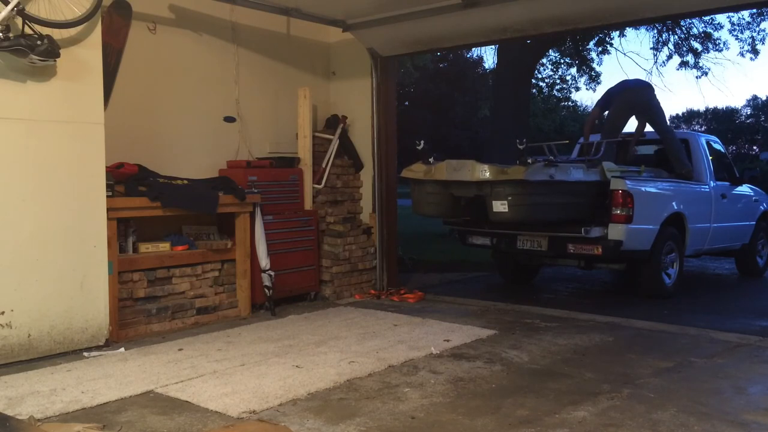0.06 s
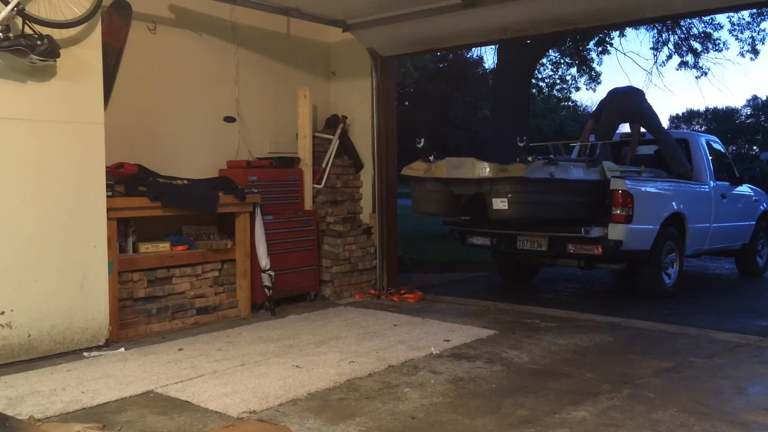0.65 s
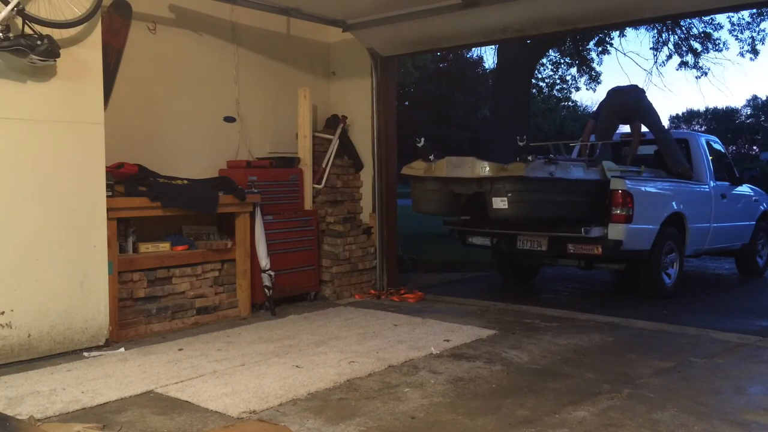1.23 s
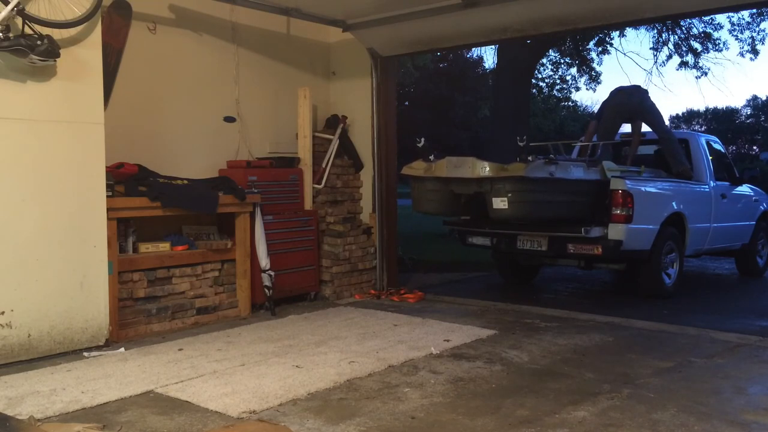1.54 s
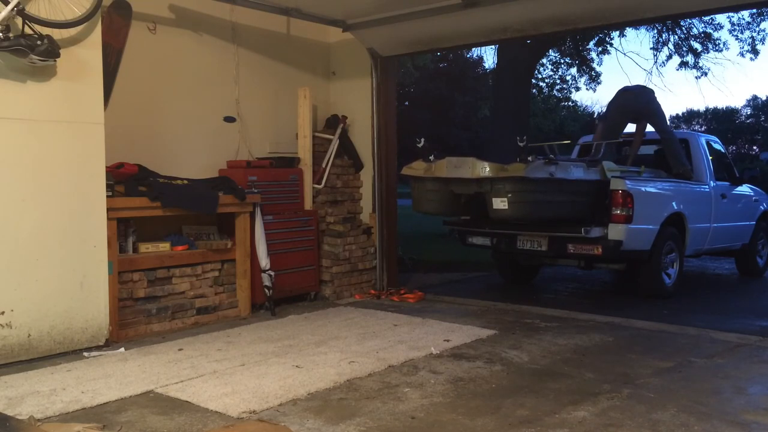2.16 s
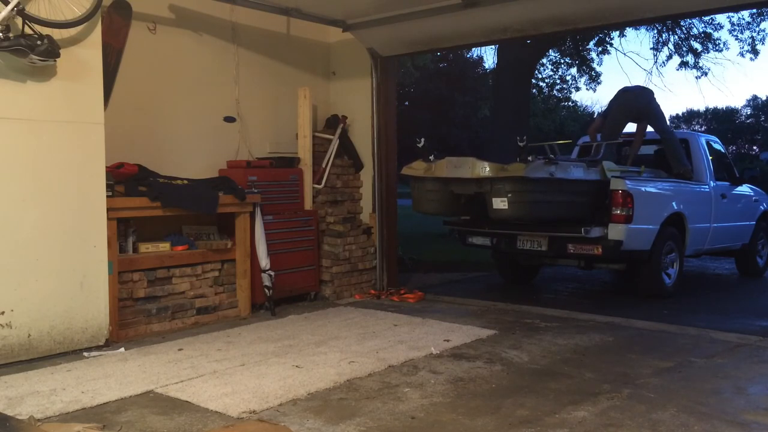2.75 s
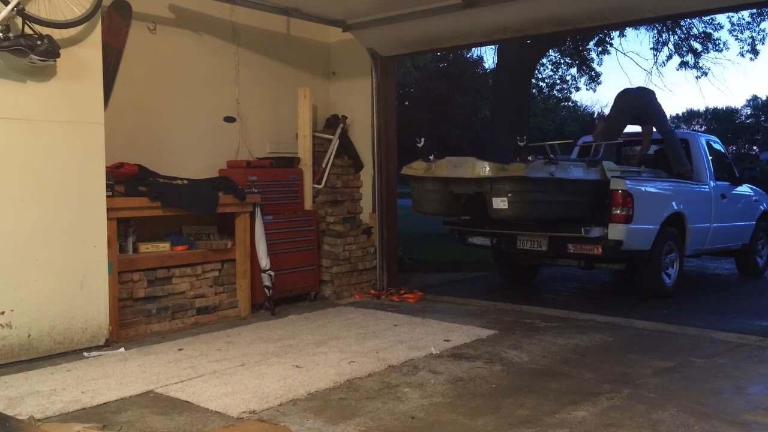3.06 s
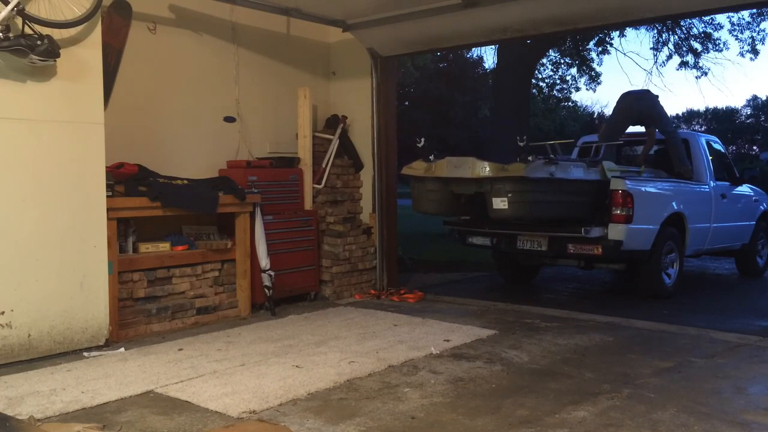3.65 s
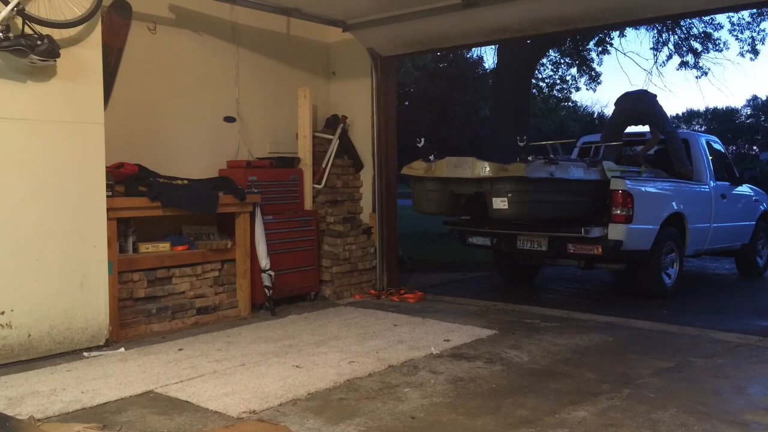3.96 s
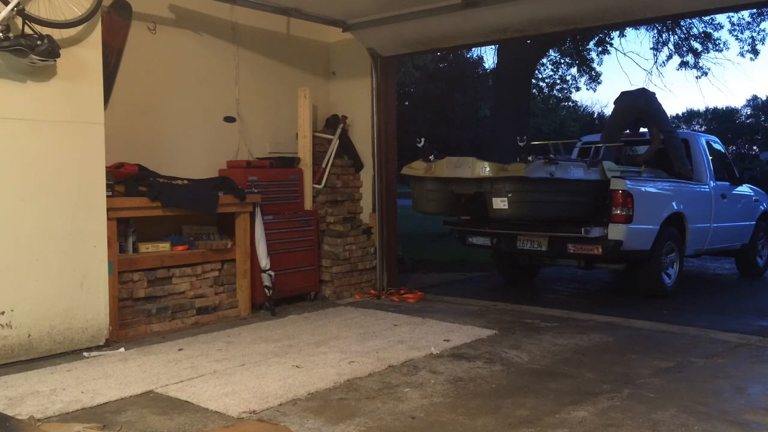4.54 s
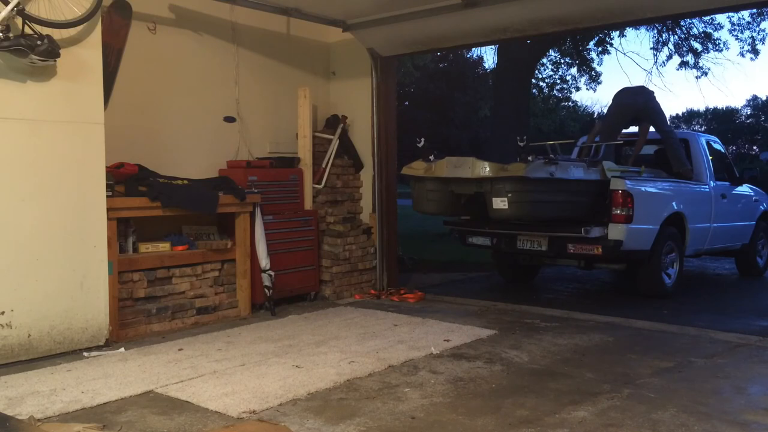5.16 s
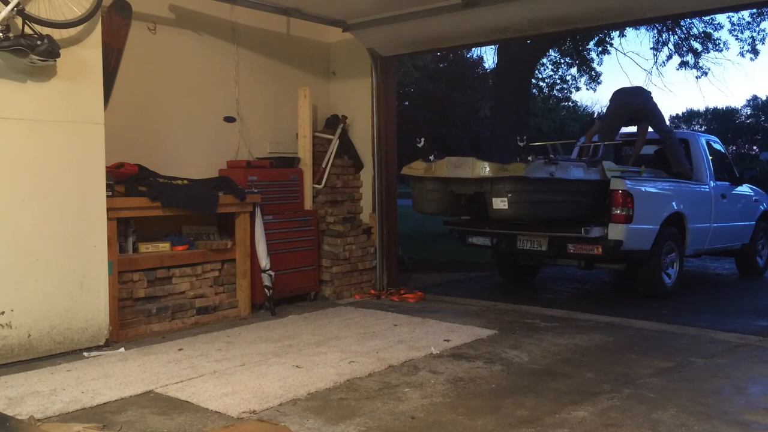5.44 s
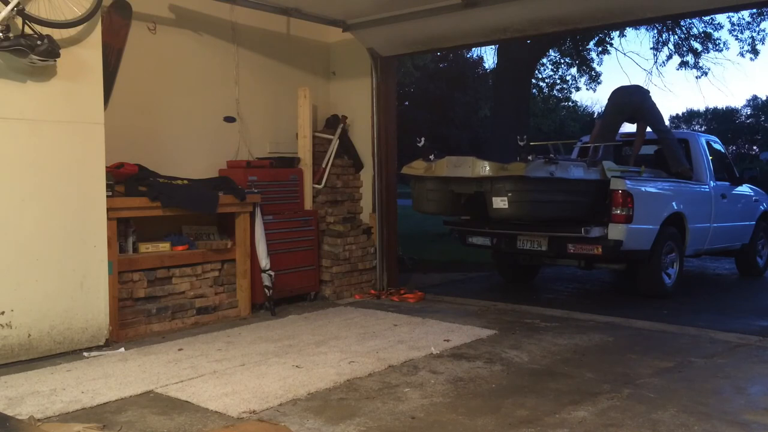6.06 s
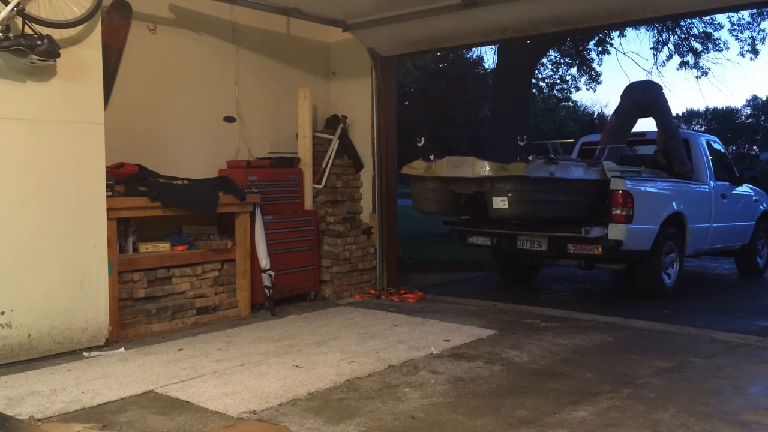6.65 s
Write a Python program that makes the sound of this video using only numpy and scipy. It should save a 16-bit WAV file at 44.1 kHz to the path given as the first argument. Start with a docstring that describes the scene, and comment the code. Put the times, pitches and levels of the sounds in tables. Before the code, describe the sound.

Scattered bumps, clicks and a few heavy hollow bangs as a boat is shifted on a truck, a small bird twittering outside.

```python
"""A plastic boat hull is shifted in a pickup bed, heard from inside an open garage.
Steps and bumps ring the bed panel, fittings snap, a hollow knock chatters. The hull scuffs in
stick-slip grains, drops hard and rocks to rest; blows ring its modes and the garage answers.
Outside, a small bird twitters in falling chips over a low, steady hum and a faint high one."""
import sys
import numpy as np
from scipy import signal
from scipy.fft import rfft, irfft, next_fast_len
from scipy.io import wavfile
from scipy.ndimage import map_coordinates

SR = 44100
rng = np.random.default_rng(int(sys.argv[2]) if len(sys.argv) > 2 else 0)


def pcm_store(signal):
    """Save signal as 16-bit PCM."""
    levels = np.round(np.clip(np.atleast_2d(signal), -1, 1) * 32767)
    wavfile.write(sys.argv[1], SR, levels.astype(np.int16).T)


N = 304290

# outdoor noise spectrum: f/Hz, density/dB
AIR_SPECTRUM = [(25, -23.5), (45, -8), (70, -2), (125, -9.5), (160, -8), (330, -14.5), (590, -22.5),
                (1050, -19.5), (1500, -28.5), (2200, -31), (3200, -35.5), (7000, -37.5), (15000, -46.5)]
# hums: f/Hz, level/dB, wander/Hz, wobble rate/(1/s), flutter/dB
HUMS = [(92.2, -55.5, 2.4, 16, 5), (2604, -79.5, 82, 600, 3)]
# low hum swell, halved for the high hum: t/s, gain/dB
HUM_SWELL = [(.4, -12), (1.05, -1), (6.9, -2)]
# clear bird chips: t/s, nominal f/Hz
CHIPS = [(0.127, 5950), (0.215, 5850), (0.823, 6860), (.887, 6430), (1.02, 6170), (1.137, 6820),
         (1.195, 6780), (1.254, 6780), (1.317, 6350), (1.349, 6080), (1.375, 6400), (1.443, 5880),
         (1.556, 5720), (1.761, 5860), (6.497, 6330), (6.569, 5600)]
# bouts of soft twitter: start/s, end/s
BOUTS = [(0, .38), (0.701, 1.92), (6.351, 6.85)]
# impact spectrum: f/Hz, density/dB
CONTACT_SPECTRUM = [(30, -26), (60, -10), (85, -16.5), (130, 1), (200, -1.5), (260, -3), (400, -2),
                    (900, -10.5), (1700, -14.5), (2200, -18.5), (2800, -23.5), (4500, -29), (7000, -34),
                    (10000, -43), (15000, -51.5)]
# boat and truck decay: f/Hz, t60/s
BODY_T60 = [(60, .45), (170, 0.6), (500, 0.46), (1500, 0.41), (4000, 0.39), (12000, 0.27)]
# garage decay: f/Hz, t60/s
GARAGE_T60 = [(60, 1.86), (200, 1.24), (700, 1.01), (2000, 0.78), (5000, 0.61), (12000, 0.37)]
# crossovers between thump, knock, clack, click: f/Hz
CROSSOVERS_HZ = [240, 700, 2500]
# steps and bumps on the bed: t/s, strength/dB, hardness/dB, panel ring/dB
BUMPS = [(.442, -46, -2, 3), (.52, -42, 0.5, -11), (.599, -49.5, 2.5, -3), (.763, -45.5, 1.5, -8.5),
         (1.052, -61, 12.5, -10), (1.106, -43.5, 3, 9.5), (1.16, -53, -1.5, 15), (1.345, -54, 4, -16),
         (1.404, -57.5, 13.5, -13), (1.726, -54, -6, -9), (2.225, -49.5, 0.5, -2.5), (2.40, -48, 7, 4),
         (2.635, -53.5, 9.5, -11), (2.667, -56, -7, -1.5), (3.02, -44.5, -1.5, -6.5),
         (3.5, -45.5, -3.5, -7), (4.395, -58, -12, -15), (5.485, -43, -3.5, -12), (5.599, -53.5, -7.5, -8),
         (5.759, -34, 2, 4.5), (5.907, -40, 2.5, -21), (6.067, -61, 9.5, -15), (6.230, -43, 2.5, -14.5),
         (6.259, -48, -7.5, -9), (6.578, -44.5, -5.5, -9.5), (6.876, -50.5, 0, -15)]
# bump thump, knock, clack, click: offset/dB, hardness slope/(dB/dB)
BUMP_BANDS = [(2.5, -0.8), (1.5, 0), (1.5, 1), (-23.5, 1.2)]
# bed panel modes, unloaded: f/Hz, level/dB, t60/s
PANEL_MODES = [(162, -14.5, 0.36), (183, -11, 0.31), (214, -6, 0.6), (270.4, -3.5, 0.47), (297.6, -3, 0.63),
               (333.3, -1, 0.6), (481, -11.5, 0.54)]
# hull slides: centre t/s, half length/s, level/dB
SCUFFS = [(0.502, 0.1, -62.5), (2.405, 0.052, -59), (4.132, 0.03, -40), (5.585, 0.038, -61.5),
          (5.687, 0.045, -64.5), (6.69, 0.081, -64)]
# scuff and snap spectrum: f/Hz, density/dB
RUB_SPECTRUM = [(150, -18.5), (400, 5.5), (1000, 5.5), (2500, -3), (6000, -4), (10000, -10.5),
                (15000, -20.5)]
# strap fitting snaps: t/s, relative level/dB
SNAPS = [(.756, -45.5), (0.9513, -50.5), (1.1081, -47), (1.1255, -48.5), (2.223, -55.5), (3.5752, -50.5),
         (4.0848, -41), (5.4525, -50), (5.986, -55.5)]
# small hollow shell modes: f/Hz, level/dB, t60/s
HOLLOW_MODES = [(400, -5, 0.23), (417, -0.5, 0.18), (461, -2.5, 0.21), (541, -1, 0.14), (599, 1, 0.18),
                (710, 3, 0.1), (827, -4, .1), (942, 11, 0.061), (1013, 2, 0.062), (1100, -0.5, 0.07),
                (1254, -2.5, 0.053)]
# heavy hull blows: t/s, strength/dB, hardness/dB, shell boom/dB, rise/s, pitch ratio
SLAMS = [(4.098, -37.5, -1.5, 13.5, 0.012, 0.86), (4.124, -33, -2.5, 2, 0.0076, 0.85),
         (4.204, -35.5, -5.5, -0.5, 0.0088, 0.81), (4.6654, -15, 5, 4.5, 0.0066, 1.007),
         (4.903, -19.5, 2.5, -1.5, 0.012, 1.004), (4.959, -23.5, -3, -8, 0.0078, 0.95),
         (5.031, -24, -1, -2, 0.0073, 1.036)]
# slam thump, knock, clack, click: offset/dB, hardness slope/(dB/dB), boom slope/(dB/dB)
SLAM_BANDS = [(-4, 0, 1.15), (-0.5, 0, 0), (6, 1, 0), (-15.5, 1.26, 0.5)]
# hull modes, free: f/Hz, level/dB, t60/s
HULL_MODES = [(94.5, -11, .35), (109.5, -6, .4), (132, -3, .28), (149, 3, .34), (161, -6, .35),
              (185.5, -3, .36), (197.4, 2, .6), (232.5, -12, .5), (356.5, -8, .46), (375.9, -6, .6),
              (398.5, -8, .4), (444.3, -8, .56), (473.6, -11, .6), (537.4, -7, .55), (618.8, -6, .52),
              (660.2, -10, .56), (710.6, -12, .56), (772, -9, .4), (887.7, -11, .5), (959.2, -11, .52),
              (1080.8, -13, .5), (1192.6, -14, .46), (1332, -16, .36), (1488.2, -14, .5),
              (1641.6, -13, .43), (1848, -19, .4), (2510, -20, .4)]
# thin rings after the hardest blows: t/s, level/dB
ZINGS = [(4.675, -48), (4.915, -63)]
# their close, beating modes: f/Hz, level/dB, t60/s
ZING_MODES = [(13043, -1, 0.34), (13088, 0.5, 0.41), (13700, -6, .45), (13770, -1, .45),
              (13720, -8.5, 0.35), (14230, -0.5, 0.43), (14460, -2.5, .45)]

TOP_HZ = 15300


def amp(db):
    """dB to gain."""
    return 10 ** (np.asarray(db) / 20)


def rms(x):
    """Root mean square."""
    return np.sqrt(np.mean(x ** 2) + 1e-20)


def along(points, hz):
    """Interpolate (f/Hz, value) points on a log axis."""
    f, v = np.transpose(points)
    return np.interp(np.log(hz + 1), np.log(f + 1), v)


def filtered(x, response):
    """Apply a frequency response."""
    size = next_fast_len(len(x) + 8192)
    return irfft(rfft(x, size) * response(np.fft.rfftfreq(size, 1 / SR)), size)[:len(x)]


def noise(spectrum, size):
    """Coloured noise, rms 1."""
    x = filtered(rng.standard_normal(size), lambda hz: amp(along(spectrum, hz)))
    return x / rms(x)


def impulses(per_s):
    """Sparse random impulses."""
    return rng.standard_normal(N) * (rng.random(N) < per_s / SR)


def wobble(per_s, size=N):
    """Smooth random curve, per_s knots a second."""
    knots = rng.standard_normal(int(size * per_s / SR) + 4)
    return map_coordinates(knots, [np.arange(size) * per_s / SR])


def damped(x, t60_curve):
    """Decay each frequency at its own t60."""
    hz, t, bins = signal.stft(x, SR, nperseg=512)
    return signal.istft(bins * amp(-60 * t / along(t60_curve, hz)[:, None]), SR)[1][:len(x)]


def ringing(modes, t, scatter_db):
    """Damped modes, random in level and phase per strike."""
    return sum(amp(db + rng.normal(0, scatter_db) - 60 * t / t60_s)
               * np.sin(2 * np.pi * (hz * t + rng.random())) for hz, db, t60_s in modes)


def add(track, at_s, x):
    """Mix x into track."""
    start = max(round(at_s * SR), 0)
    part = track[start:start + len(x)]
    part += x[:len(part)]


def garage(x, wet_db):
    """Direct sound plus diffuse tail."""
    t = np.arange(SR) / SR
    tail = damped(rng.standard_normal(SR), GARAGE_T60) * (1 - np.exp(-t / 0.0031))
    return x + amp(wet_db) * signal.fftconvolve(x, tail / np.linalg.norm(tail))[:N]


def outdoors():
    """Soft evening noise; a wavering low hum and a fuzzy high one swell, then hold."""
    out = amp(-60) * noise(AIR_SPECTRUM, N)
    swell_db = np.interp(np.arange(N) / SR, *np.transpose(HUM_SWELL))
    for (hz, db, wander_hz, per_s, flutter_db), share in zip(HUMS, [1, 0.5]):
        phase = 2 * np.pi * np.cumsum(hz + wander_hz * wobble(per_s)) / SR
        out += amp(db + share * swell_db + flutter_db * wobble(per_s)) * np.sqrt(2) * np.sin(phase)
    return out


def bird(twitter_per_s=7.2, low_hz=4450, high_hz=6000, twitter_db=-5, ref_hz=5950):
    """Chips plunge in pitch and fade, higher ones louder and shorter; soft ones come at random."""
    out, t = np.zeros(N), np.arange(SR // 20) / SR
    chips = [(at_s, hz, 0) for at_s, hz in CHIPS]
    for start_s, end_s in BOUTS:
        for k in range(round((end_s - start_s) * twitter_per_s)):
            at_s = start_s + (k + rng.random()) / twitter_per_s
            chips.append((at_s, rng.uniform(low_hz, high_hz), twitter_db))
    for at_s, hz, offset_db in chips:
        age = t / 0.013 * (hz / ref_hz) ** 1.57  # in chip lengths
        fall_octaves = 0.38 * age ** 1.22
        flutter = 1 + 0.034 * wobble(650, size=len(t))
        pitch_hz = hz * 1.05 * 2 ** -fall_octaves * flutter
        envelope = (1 - np.exp(-(age / 0.12) ** 2)) * np.exp(-age ** 2)
        db = -55 + offset_db + 8 * np.log2(hz / ref_hz)
        add(out, at_s - 0.002, amp(db) * envelope * np.sin(2 * np.pi * np.cumsum(pitch_hz) / SR))
    return garage(out, wet_db=-2)


def blow(modes, band_db, ring_db, rise_s, pitch_ratio, t60_ratio, size, clack_cut_db, crack_db, room_db):
    """One impact: a few clear modes plus a dense crowd, weighted in four bands."""
    t, head = np.arange(size) / SR, slice(0, SR // 25)
    thump_db, knock_db, clack_db, click_db = band_db
    onset = np.minimum(t / max(rise_s, 0.001), 1)
    crack = 1 + amp(crack_db - 60 * t / 0.03)  # direct sound above the first echoes
    spectrum = np.multiply(CONTACT_SPECTRUM, [pitch_ratio, 1])
    body = damped(noise(spectrum, size), np.multiply(BODY_T60, [1, t60_ratio]))
    room = damped(noise(spectrum, size), np.multiply(GARAGE_T60, [1, t60_ratio]))
    crowd = body * crack * onset + amp(room_db) * room * (1 - np.exp(-t / 0.025))
    # strike point and grip shift pitch and damping
    struck = np.multiply(modes, [pitch_ratio, 1, t60_ratio])
    # dull blows barely stir the upper modes
    struck[:, 1] += min(knock_db - thump_db, 0) * np.clip(np.log2(struck[:, 0] / 240), 0, 1)
    ring = ringing(struck, t, scatter_db=2) * onset
    out = amp(max(thump_db, knock_db) + ring_db) * ring / rms(ring[head])
    edges_hz = [20, *CROSSOVERS_HZ, 20000]
    for k, db in enumerate([thump_db, knock_db, clack_db - clack_cut_db, click_db]):
        band = signal.sosfilt(signal.butter(3, edges_hz[k:k + 2], 'band', fs=SR, output='sos'), crowd)
        out += amp(db) * band / rms(band[head])
    return out


def truck_bed(gain_db):
    """Steps and bumps ring the loaded panel; harder contact is quicker and brighter."""
    out = np.zeros(N)
    for at_s, db, hardness_db, ring_db in BUMPS:
        band_db = db + gain_db + np.dot(BUMP_BANDS, [1, hardness_db])
        rise_s = 0.007 * 2 ** (-hardness_db / 16)
        add(out, at_s, blow(PANEL_MODES, band_db, ring_db, rise_s, pitch_ratio=1.003, t60_ratio=0.9,
                            size=SR // 2, clack_cut_db=7, crack_db=-0.3, room_db=-15))
    return out


def settling_load(calm_db_per_s=21.5):
    """After each bump or slam the load settles in tiny, dull taps."""
    power, t = np.zeros(N), np.arange(2 * SR) / SR
    for at_s, db, *_ in [*BUMPS, *SLAMS]:
        stir_db = -58 + 0.4 * (db + 45) - calm_db_per_s * t
        add(power, at_s, amp(stir_db) ** 2 * (1 - np.exp(-t / 0.0395)))
    taps = impulses(per_s=140)
    shell = damped(noise(CONTACT_SPECTRUM, SR // 4), BODY_T60)
    patter = signal.fftconvolve(taps, shell)[:N]
    dull = signal.sosfilt(signal.butter(1, 900, fs=SR, output='sos'), patter)
    return np.sqrt(power) * dull / rms(dull)


def hull_scuffs():
    """Sliding plastic sticks and slips in tiny grains."""
    t = np.arange(N) / SR
    strokes = sum(amp(db) * np.exp(-((t - at_s) / half_s) ** 2) for at_s, half_s, db in SCUFFS)
    grains = filtered(impulses(per_s=1500), lambda hz: amp(along(RUB_SPECTRUM, hz)))
    return garage(strokes * grains / rms(grains), wet_db=-4.5)


def strap_fittings(gain_db=1.5, rise_s=0.0033, t60_s=0.056):
    """Hooks and buckles snap: short noise bursts."""
    out, t = np.zeros(N), np.arange(SR // 10) / SR
    for at_s, db in SNAPS:
        envelope = amp(db + gain_db - 60 * t / t60_s) * (1 - np.exp(-t / rise_s))
        add(out, at_s, envelope * noise(RUB_SPECTRUM, len(t)))
    return garage(out, wet_db=0.5)


def hollow_chatter(at_s, contacts, first_db=-37.5, loss_db=2, first_gap_s=0.009, gap_ratio=1.22):
    """A knock chatters on a small, damped shell, ever slower and weaker."""
    out, t = np.zeros(N), np.arange(SR // 3) / SR
    for k in range(contacts):
        ring = ringing(HOLLOW_MODES, t, scatter_db=0) * (1 - np.exp(-t / 0.0018))
        add(out, at_s, amp(first_db - k * loss_db) * ring / rms(ring[:SR // 50]))
        at_s += first_gap_s * gap_ratio ** k
    return garage(out, wet_db=-17)


def hull_blows(gain_db, rock_count, rock_at_s=5.21, gap_s=0.093, loss_db=4.5):
    """The hull is shoved while held, drops free, falls back and rocks to rest."""
    out = np.zeros(N)
    # columns as SLAMS
    rocks = [(rock_at_s + k * gap_s, -40 - k * loss_db, -3.5, 0.5, 0.011, 1) for k in range(rock_count)]
    for at_s, db, hardness_db, boom_db, rise_s, pitch_ratio in [*SLAMS, *rocks]:
        band_db = db + gain_db + np.dot(SLAM_BANDS, [1, hardness_db, boom_db])
        ring_db = boom_db - max(band_db[0] - band_db[1], 0)  # modes sit boom_db above the knock
        t60_ratio = pitch_ratio ** 3  # pressing on the hull lowers and damps it
        add(out, at_s, blow(HULL_MODES, band_db, ring_db, rise_s, pitch_ratio, t60_ratio,
                            size=SR, clack_cut_db=8.5, crack_db=0.5, room_db=-12))
    return out


def zings(rise_s=0.03):
    """A thin, high ring swells; close modes beat as it fades."""
    out, t = np.zeros(N), np.arange(SR // 2) / SR
    for at_s, db in ZINGS:
        ring = ringing(ZING_MODES, t, scatter_db=1.5) * (1 - np.exp(-t / rise_s))
        add(out, at_s, amp(db) * ring / rms(ring[:SR // 10]))
    return out


def scene():
    """Mono mix, heard in the garage."""
    load = truck_bed(gain_db=-6) + hull_blows(gain_db=-3, rock_count=3) + zings()
    load += hollow_chatter(at_s=3.018, contacts=5) + strap_fittings() + hull_scuffs() + settling_load()
    return (load + bird() + outdoors())[None]


def record(dry):
    """Soft-clip peaks; cut above TOP_HZ."""
    rounded = dry[0] / (1 + np.abs(dry[0]) ** 6) ** (1 / 6)
    return filtered(rounded, lambda hz: hz < TOP_HZ)[None]


dry = scene()
out = record(dry)
pcm_store(out)
```